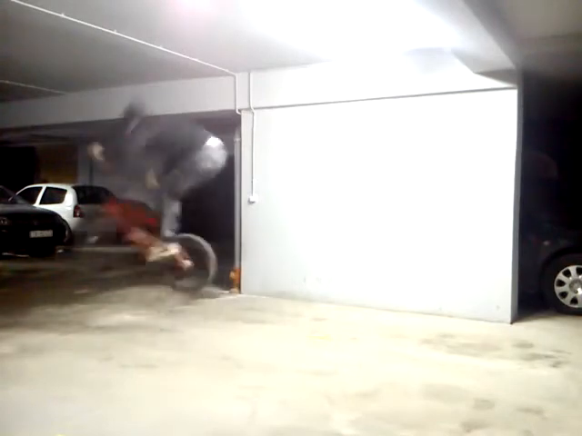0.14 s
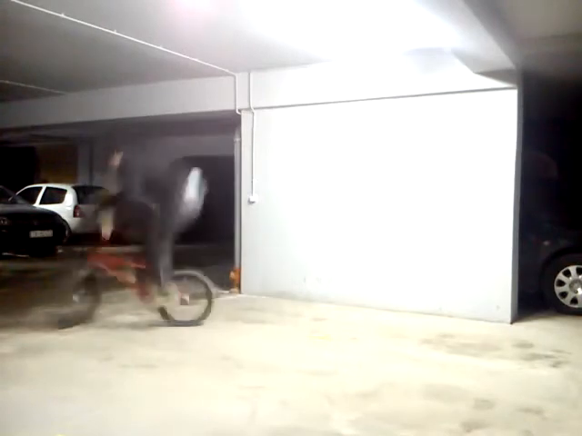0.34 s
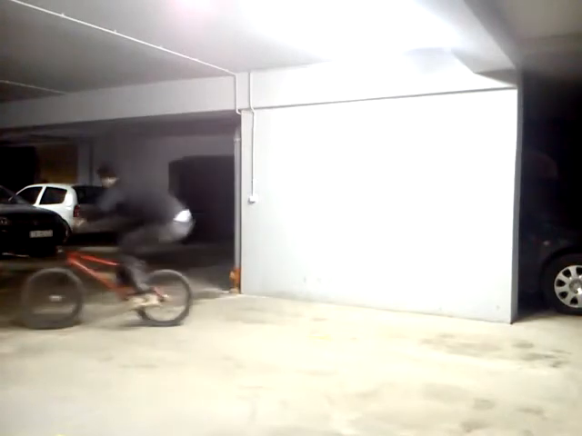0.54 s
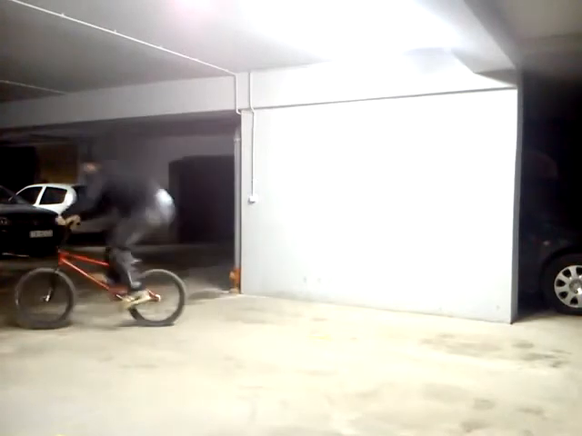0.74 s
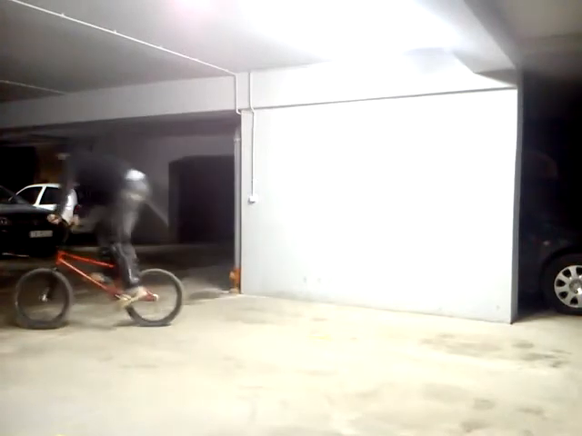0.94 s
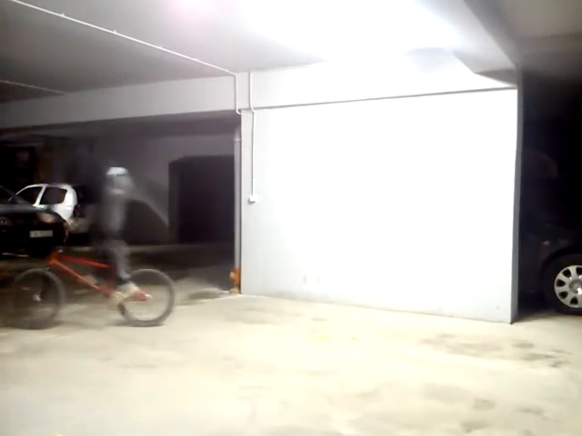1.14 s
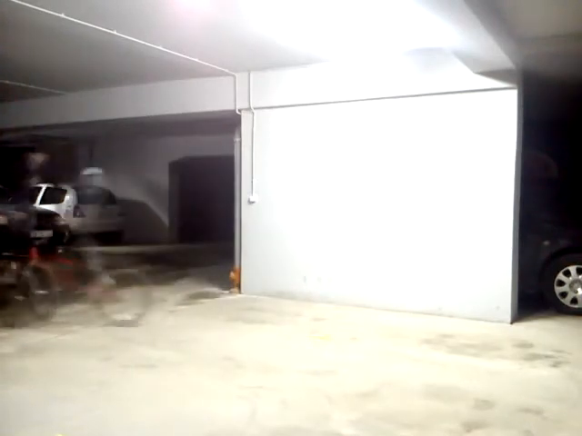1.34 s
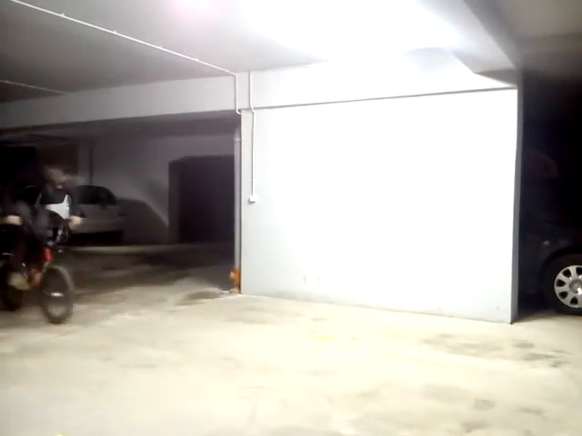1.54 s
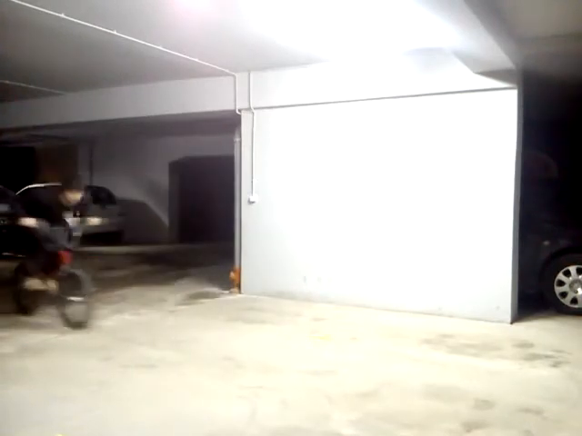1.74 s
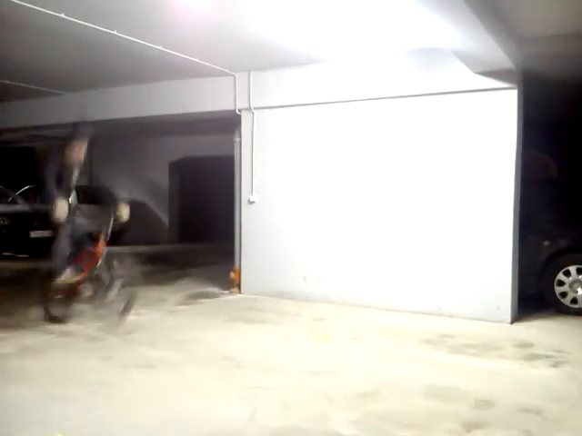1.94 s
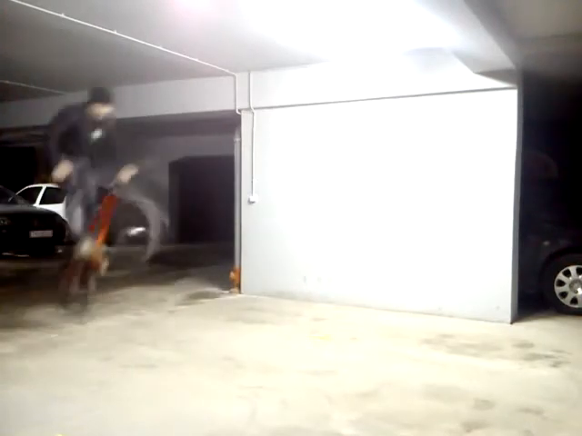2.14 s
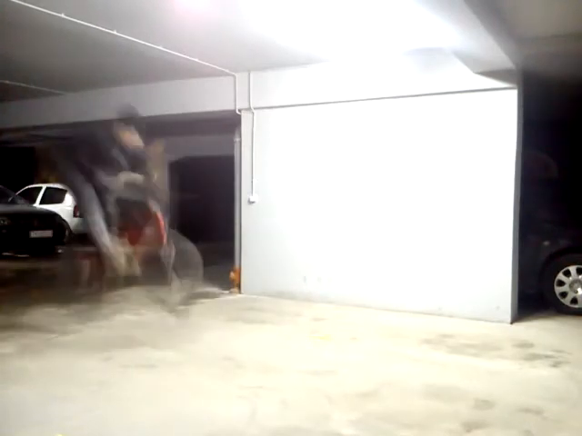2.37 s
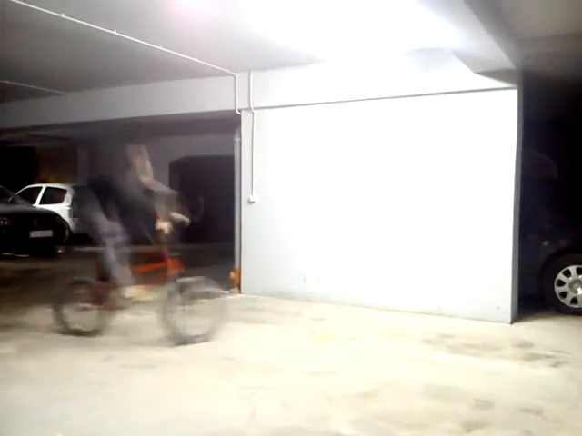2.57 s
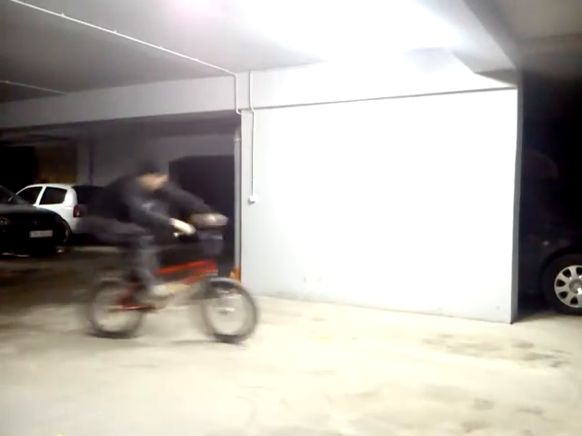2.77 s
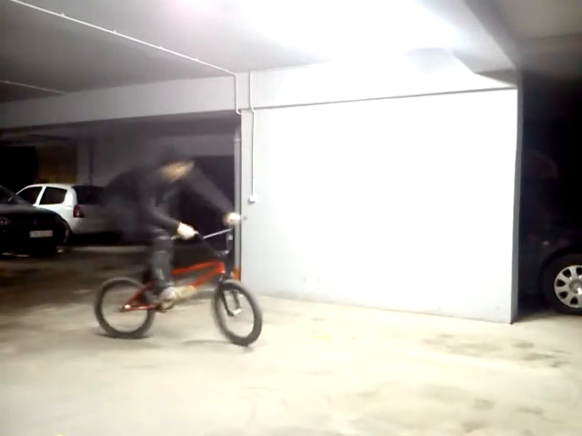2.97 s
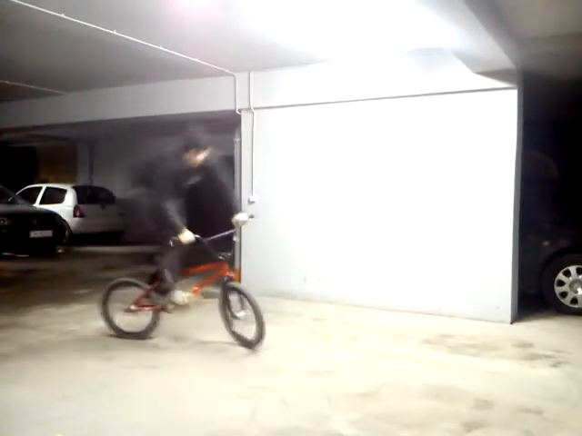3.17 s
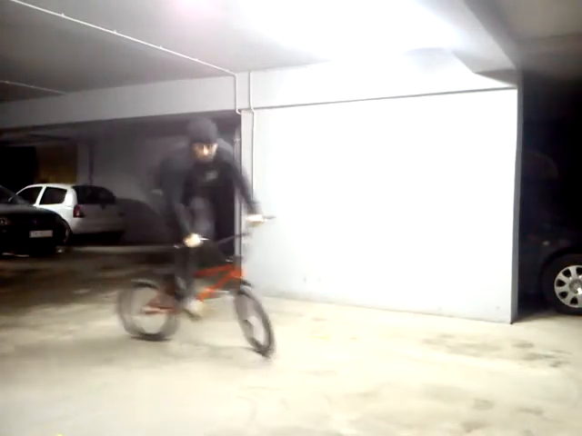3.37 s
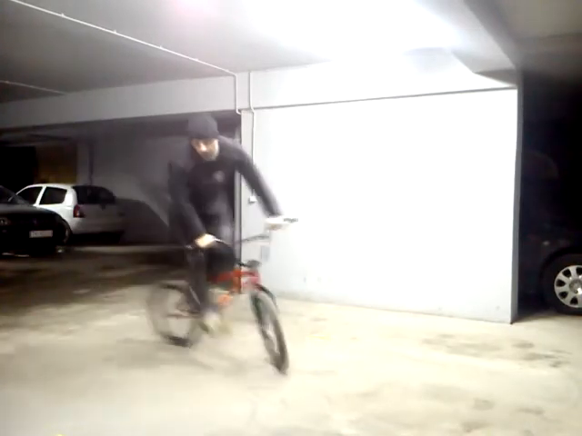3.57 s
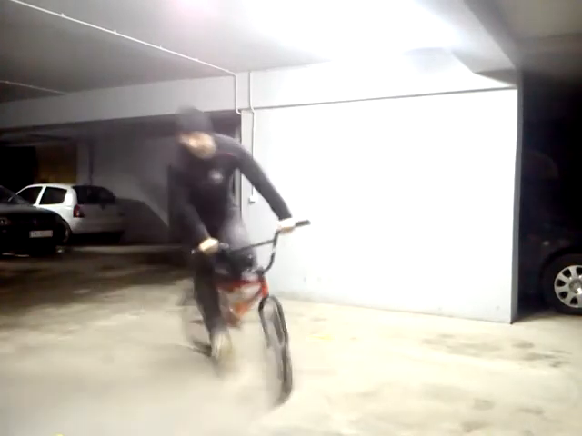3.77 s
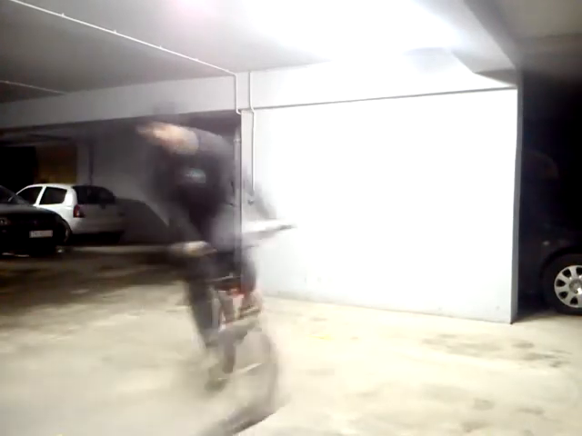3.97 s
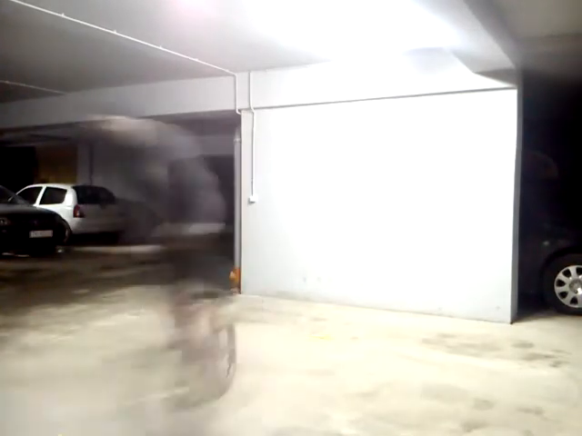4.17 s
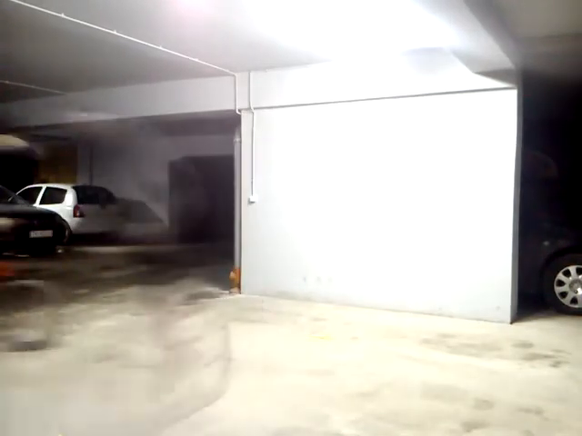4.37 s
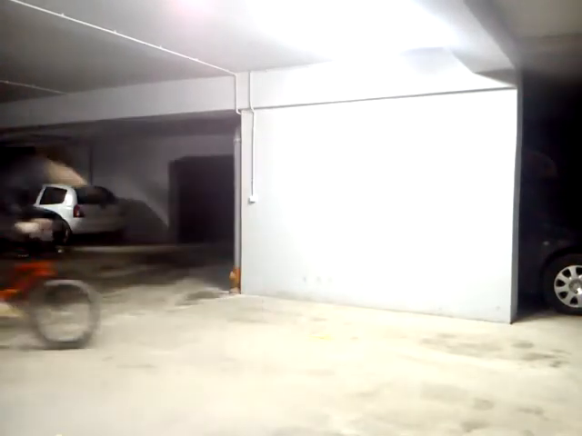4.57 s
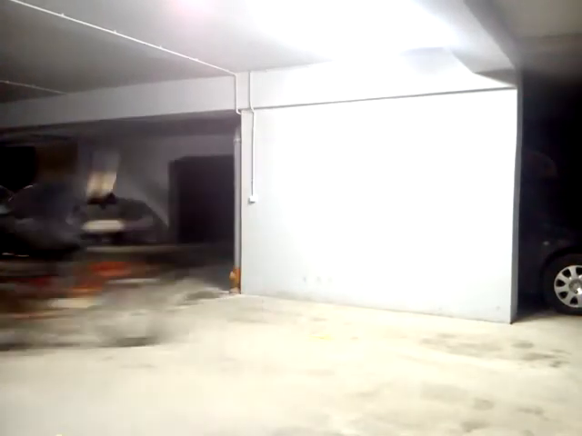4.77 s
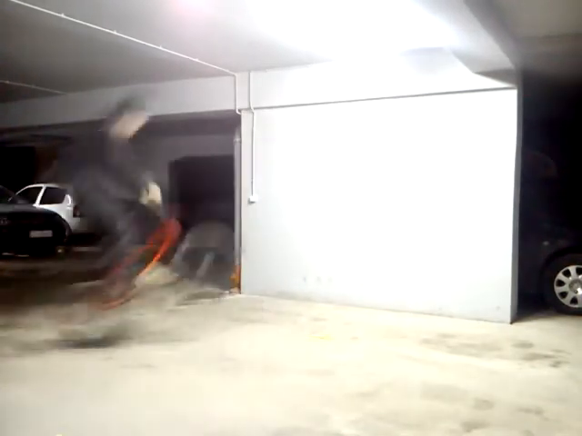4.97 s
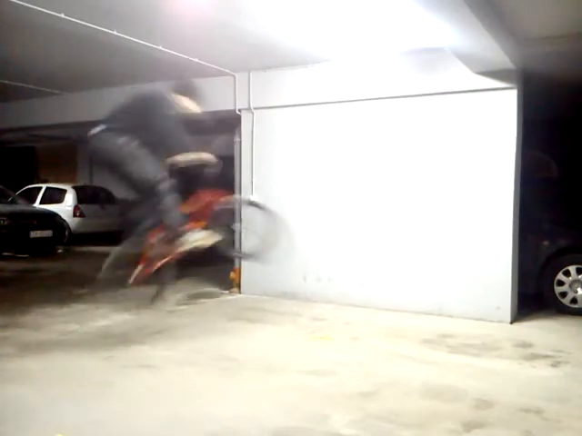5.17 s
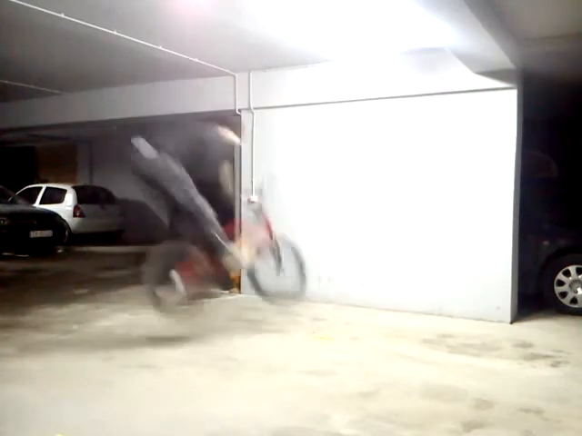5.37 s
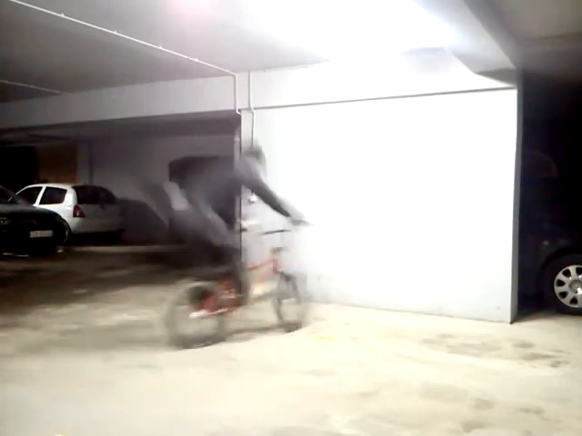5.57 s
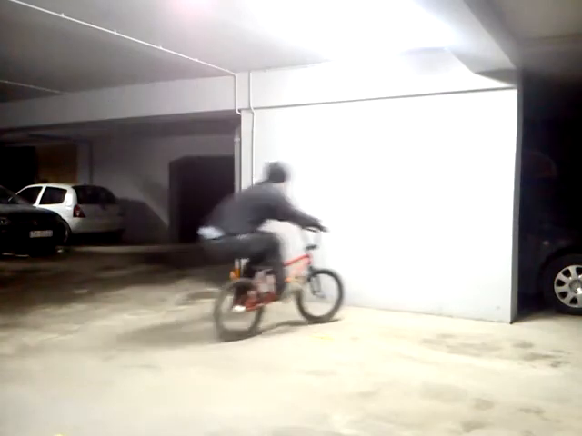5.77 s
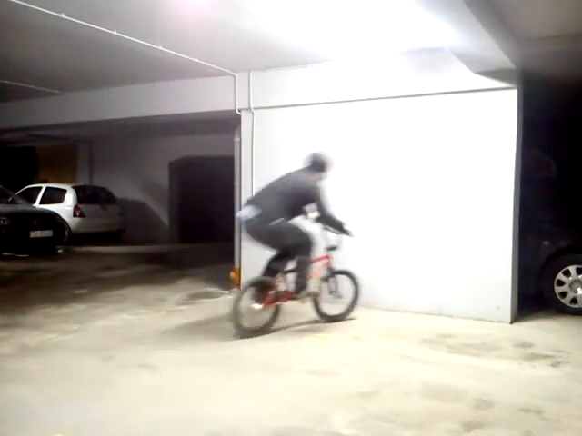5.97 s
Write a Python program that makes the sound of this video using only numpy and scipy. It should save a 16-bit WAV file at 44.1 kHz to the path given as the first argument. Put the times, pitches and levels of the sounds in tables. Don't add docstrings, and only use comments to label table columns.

```python
import sys
import numpy as np
from scipy import signal
from scipy.fft import rfft, irfft
from scipy.io import wavfile
from scipy.ndimage import uniform_filter1d

SR = 44100
rng = np.random.default_rng(int(sys.argv[2]) if len(sys.argv) > 2 else 0)


def natural_amplitude(level_db):
    exponent = np.asarray(level_db, float) / 20
    return 10 ** exponent


def waveform_to_disk(signal):
    frames = np.transpose(np.atleast_2d(signal))
    scaled = np.clip(frames, -1, 1) * 32767
    samples = np.round(scaled).astype(np.int16)
    wavfile.write(sys.argv[1], SR, samples)


N = 265041

# pitch_hz, density_db (per Hz)
AIR_COLOUR = [(60, -16.5), (180, -21), (1000, -23.5), (2500, -23.5), (6000, -28), (11000, -27.5),
              (14000, -36), (16000, -51)]
# peak_s, grit_level_db, rise_s, fall_s, weight_on_tyre_db
SCUFFS = [(0.06, -46, 0.22, 0.11, -3), (0.27, -43, 0.16, 0.057, 0), (0.845, -59, 0.013, 0.024, 8),
          (1.2, -55.5, 0.21, 0.17, 6.5), (1.42, -51.5, 0.22, 0.23, -8), (1.71, -46.5, 0.09, 0.14, -5),
          (1.89, -43, 0.14, 0.19, 2.5), (2.23, -43, 0.1, 0.13, -7.5), (2.43, -47, 0.16, 0.45, 4.5),
          (2.66, -43.5, 0.14, 0.15, 17.5), (3.02, -63.5, 0.16, 0.029, 19), (3.5, -63, 0.51, 0.19, 0),
          (3.73, -57.5, 0.087, 0.045, -10), (3.8, -49.5, 0.043, 0.064, 6), (3.93, -51.5, 0.14, 0.12, 10),
          (4.12, -49, 0.17, 0.29, 5), (4.381, -48, 0.2, 0.18, 0.5), (4.59, -48, .015, .03, -12),
          (4.68, -42.5, 0.07, 0.22, -4), (4.85, -43, 0.19, 0.24, 4.5), (5.18, -42.5, 0.12, 0.14, -7),
          (5.42, -44.5, 0.21, 0.11, 4.5), (5.795, -55.5, 0.05, 0.06, 28), (5.952, -51, 0.013, 0.026, 5)]
# pitch_hz, width_hz, level_db
GRIT_BANDS = [(7160, 610, 2.5), (9000, 2770, 0), (13370, 7100, -9), (5250, 2700, -6.5)]
# pitch_hz, width_hz, level_db
TREAD_BANDS = [(3030, 940, -3), (4070, 710, 1.5), (2360, 310, -9)]
# start_s, pitch_hz, width_hz, level_db,
# t60_s
FRAME_HUMS = [
    (0.3095, 1640, 700, -45.5, 2.36),
    (2.53, 1630, 330, -44, 2.15),
    (5.52, 1130, 450, -38, 2),
    (5.519, 5650, 270, -13.5, 0.037),
    (0.36, 703, 260, -45.5, 1.67),
    (1.92, 137, 24, -63.5, 0.6),
    (0.042, 500, 55, -64.5, 0.44),
    (2.55, 713, 300, -48.5, 2.02),
]
# peak_s, pitch_hz, level_db, rise_s, fall_s
TYRE_TONES = [
    (0.1, 137.4, -68.5, 0.046, 0.05),
    (1.809, 230, -61, 0.053, .06),
    (1.915, 322, -59, 0.018, .03),
    (4.88, 376, -56.5, 0.034, 0.034),
    (5.015, 302, -54.5, 0.034, 0.035),
    (5.42, 51.9, -59, .1, .1),
]
# start_s, slap_level_db, thump_db and rattle_db (both relative to the slap)
CONTACTS = [(0.192, -50, 2, -3), (0.315, -26, -10, 3.5), (0.323, -23, -11.5, -3), (0.332, -24, -12, -4),
            (0.341, -18, -2, -11), (0.347, -17, -15, -14), (0.353, -23, -8, -3.5), (0.361, -22.5, -11, -2),
            (0.375, -22, -6.5, -6), (0.388, -21.5, -6.5, -5), (0.834, -35.5, -28, -18), (1.899, -47, 3, 11),
            (1.92, -43.5, -13, 4), (2.513, -24, -4.5, -12), (2.519, -24.5, -24, -4),
            (2.527, -21, -4.5, -2.5), (2.536, -21.5, -14, -4.5), (2.547, -20.5, -6, -8),
            (2.563, -21, -25, -3), (3.029, -42.5, -16, -19), (4.851, -54.5, 4.5, 20), (4.889, -61, -7, 7),
            (5.491, -35, -4, 0), (5.498, -22, -4, -2), (5.511, -16, -2, -1), (5.519, -11, -16, -6),
            (5.531, -16, -15.5, -22), (5.548, -16, -35, -6.5), (5.789, -34, -15, -0.5),
            (5.95, -37, -21, -18)]
# pitch_hz, width_hz, level_db
CARCASS = [(226.7, 62.3, 11), (382, 139, 15.5), (136, 163, -10.5), (62, 78, -9)]
# pitch_hz, width_hz, level_db
SLAP_BANDS = [(689, 634, 6), (1161, 1060, 11.5), (1920, 3020, 7.5), (3830, 2870, 3)]
# pitch_hz, width_hz, level_db
RATTLE_BANDS = [(4810, 2380, 0.5), (7370, 5760, 3), (9470, 4780, 2.5)]
# peak_s, level_db, rise_s, fall_s
SQUEALS = [
    (5.2, -52.5, 0.096, 0.074),
    (5.4, -56, 0.12, 0.12),
]
# pitch_hz, t60_s, level_db
HALL_DECAY = [(39, 3.2, 0), (120, 1.33, 17.5), (271, 0.92, -0.5), (470, 0.6, 3.5), (795, 1.48, -3.5),
              (2500, 1.65, -2), (5230, 1.09, 0), (10900, 0.69, 1)]
# pitch_hz, level_db, t60_s
BASS_MODES = [(50, -4, 1.62), (54.13, -2.5, 2.03), (132.8, -20, 2.7), (134.2, -7, 1.46), (29.66, 1.5, 1.5)]


def rms_one(x):
    return x / np.sqrt(np.mean(x ** 2))


def resonate(x, peaks):
    out = 0
    for k, (hz, width, db) in enumerate(peaks):
        b, a = signal.iirpeak(hz, hz / width, SR)
        out = out + (-1) ** k * natural_amplitude(db) * signal.lfilter(b, a, x)
    return out


def twice(x, hz, width):
    return resonate(resonate(x, [(hz, width, 0)]), [(hz, width, 0)])


def grains(rate_hz, spread_db):
    hit = rng.random(N) < rate_hz / SR
    size = natural_amplitude(spread_db * rng.exponential(size=N))
    return rms_one(hit * rng.standard_normal(N) * size)


def walk(rate_hz):
    hold = int(SR / rate_hz)
    levels = np.repeat(rng.standard_normal(N // hold + 1), hold)
    return 3.0 * uniform_filter1d(levels, hold)[:N]


def swell(peak_s, rise_s, fall_s):
    away = np.arange(N) / SR - peak_s
    return -12 * (away / np.where(away < 0, rise_s, fall_s)) ** 2


def air():
    hz = np.fft.rfftfreq(N, 1 / SR)
    known_hz, db = np.transpose(AIR_COLOUR)
    colour = natural_amplitude(np.interp(np.log(hz + 1), np.log(known_hz), db))
    hiss = irfft(rfft(rng.standard_normal(N)) * colour, N)
    return natural_amplitude(-61) * rms_one(hiss)


def scuffs():
    tread_db, whirr_db, rumble_db = -8, -18.5, -26
    rumble_per_weight = 1.17
    grit = resonate(resonate(grains(20000, 1.2), GRIT_BANDS), [(8900, 22000, 0)])
    tread = resonate(resonate(grains(12000, 0.96), TREAD_BANDS), [(3630, 8200, 0)])
    whirr = resonate(resonate(grains(6000, 0.89), [(1240, 5000, 0)]), [(1220, 5200, 0)])
    rumble = resonate(resonate(grains(3000, 1.1), [(231, 166, 0.5), (402, 320, 0)]), [(290, 620, 0)])
    scrub = rms_one(grit) + natural_amplitude(tread_db) * rms_one(tread)

    scrub_power, whirr_power, rumble_power = np.zeros((3, N))
    for s, db, rise, fall, weight_db in SCUFFS:
        power = natural_amplitude(2 * (db + swell(s, rise, fall)))
        scrub_power += power
        whirr_power += power * natural_amplitude(2 * (whirr_db + weight_db))
        rumble_power += power * natural_amplitude(2 * (rumble_db + rumble_per_weight * weight_db))
    out = np.sqrt(scrub_power) * scrub
    out += np.sqrt(whirr_power) * rms_one(whirr)
    out += np.sqrt(rumble_power) * rms_one(rumble)
    return natural_amplitude(0.4 * walk(18)) * out


def frame():
    t = np.arange(N) / SR
    out = np.zeros(N)
    for s, hz, width, db, t60 in FRAME_HUMS:
        age = np.maximum(t - s, 0)
        onset = np.minimum(age / 0.005, 1)
        band = rms_one(twice(rng.standard_normal(N), hz, width))
        out += natural_amplitude(db) * band * onset * 1000. ** (-age / t60)
    return out


def tyre_tones():
    t = np.arange(N) / SR
    out = np.zeros(N)
    for s, hz, db, rise, fall in TYRE_TONES:
        out += natural_amplitude(db + swell(s, rise, fall)) * np.sin(2 * np.pi * hz * (t - s))
    return out


def contacts():
    slap_decay_s = 0.011
    push, slap, rattle = np.zeros((3, N))
    t = np.arange(SR // 8) / SR
    rough, chain = grains(22000, 0.93), grains(26000, 0.49)
    for s, slap_db, thump_db, rattle_db in CONTACTS:
        start = int(s * SR)
        at = slice(start, min(start + len(t), N))
        age = t[:at.stop - start]
        fade = np.exp(-age / slap_decay_s)
        push[at] += natural_amplitude(slap_db + thump_db - 2.5) * age / 0.0006 * np.exp(1 - age / 0.00059)
        slap[at] += natural_amplitude(slap_db - 2.0) * fade
        rattle[at] += natural_amplitude(slap_db + rattle_db + 1.0) * fade ** 0.66 * np.minimum(age / 0.0048, 1)
    clatter = resonate(slap * rough, SLAP_BANDS) + resonate(rattle * chain, RATTLE_BANDS)
    return resonate(push, CARCASS), clatter


def squeals():
    squeal = rms_one(twice(rng.standard_normal(N), 2940, 300))
    return squeal * sum(natural_amplitude(db + swell(s, rise, fall)) for s, db, rise, fall in SQUEALS)


def hall():
    build_s = 0.0056
    size = 2 * SR
    t = np.arange(size) / SR
    hz = np.fft.rfftfreq(size, 1 / SR)
    noise = rfft(rng.standard_normal(size))
    known_hz, t60s, dbs = np.transpose(HALL_DECAY)
    out = np.zeros(size)
    for octave in np.arange(15, 43) / 3:
        share = np.clip(1 - 3 * np.abs(np.log2(hz + 1) - octave), 0, 1)
        t60 = np.interp(octave, np.log2(known_hz), t60s)
        db = np.interp(octave, np.log2(known_hz), dbs)
        out += natural_amplitude(db) * irfft(noise * share) * 1000. ** (-t / t60)
    out *= 1 - np.exp(-t / build_s)
    return out / np.sqrt(.07 * SR)


def bass_modes():
    t = np.arange(3 * SR) / SR
    return sum(natural_amplitude(db) * np.sin(2 * np.pi * hz * t) * 1000. ** (-t / t60) for hz, db, t60 in BASS_MODES)


def scene():
    background = air()
    roll = scuffs() + frame() + tyre_tones() + squeals()
    thump, clatter = contacts()
    knocks = thump + clatter
    to_hall = natural_amplitude(-1.5) * knocks + natural_amplitude(-6.5) * roll
    echo = signal.fftconvolve(to_hall, hall())[:N]
    boom = natural_amplitude(-37) * signal.fftconvolve(thump, bass_modes())[:N]
    mono = knocks + roll + echo + boom + background
    return np.array([mono, mono])


def top_cut(x):
    return signal.sosfilt(signal.butter(12, 15740, fs=SR, output="sos"), x)


def record(dry):
    late = np.roll(dry[0], 300)
    stray = natural_amplitude(-31.5) * resonate(late, [(1640, 1200, 4.7), (4650, 3700, 5.1), (14100, 330, 15.0)])
    low_pass = signal.ellip(10, .2, 70, 15700, fs=SR, output="sos")
    cut = signal.sosfilt(low_pass, dry + np.array([stray, -stray]))
    return top_cut(cut + 0.00089)


dry = scene()
out = record(dry)
waveform_to_disk(out)
```